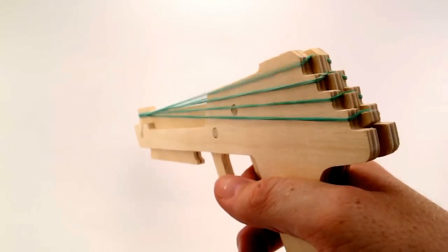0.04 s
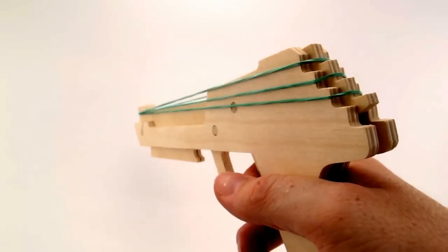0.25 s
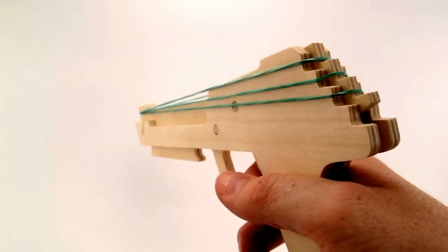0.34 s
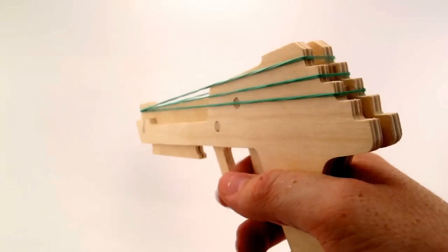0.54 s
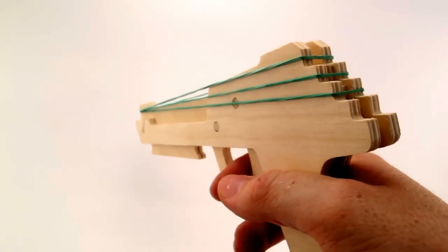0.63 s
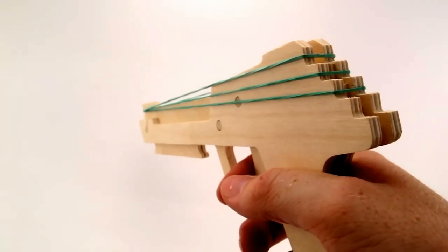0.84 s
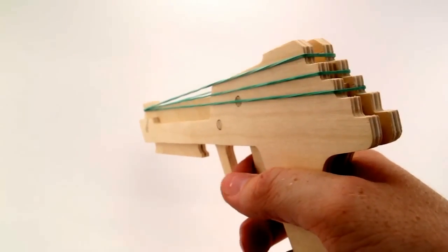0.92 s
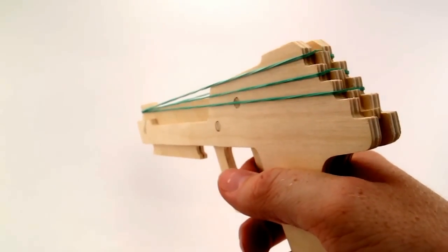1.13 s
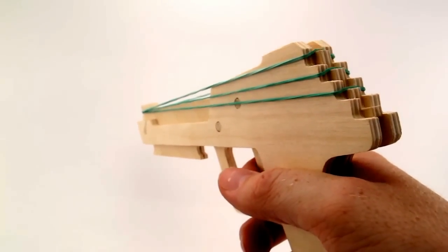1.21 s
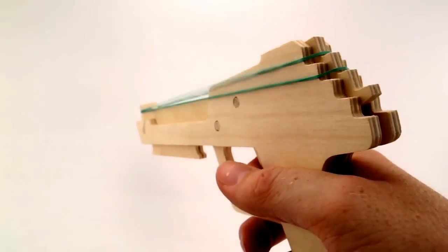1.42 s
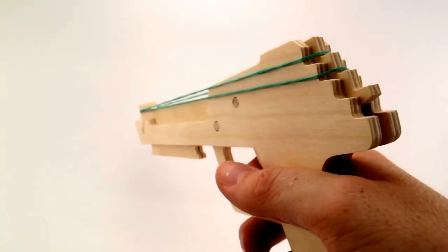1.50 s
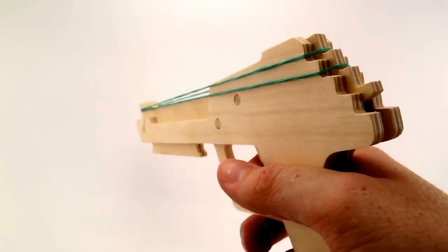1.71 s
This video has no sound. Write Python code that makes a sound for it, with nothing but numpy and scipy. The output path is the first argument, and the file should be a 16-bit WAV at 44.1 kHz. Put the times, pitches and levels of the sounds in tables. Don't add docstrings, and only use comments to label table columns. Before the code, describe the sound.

A wooden rubber band gun fires twice, sharp snapping cracks with creaky trigger ticks in a room

```python
import sys
import numpy as np
from scipy import signal
from scipy.fft import rfft, irfft, next_fast_len
from scipy.io import wavfile
from scipy.ndimage import uniform_filter1d

SR = 44100
rng = np.random.default_rng(int(sys.argv[2]) if len(sys.argv) > 2 else 0)


def put_to_file(sound):
    columns = np.atleast_2d(sound).T
    safe = np.clip(columns, -1, 1)
    whole_steps = np.round(safe * 32767)
    wavfile.write(sys.argv[1], SR, whole_steps.astype(np.int16))


def field_ratio(decibels):
    return 10 ** (np.asarray(decibels, dtype=float) / 20)


N = 77175

# f/Hz, likeness/1
LIKENESS = [(60, 0.89), (240, 1), (950, 1), (2000, 0.7), (3770, 0.52), (7000, .3), (15000, .05)]
# f/Hz, level/dB
AIR_PAN = [(60, -2.5), (240, -1.5), (950, -4), (3000, 8), (6400, -12.5), (15000, -0.5)]
# f/Hz, phase/rad
AIR_LEAD = [(100, -.06), (500, -.3), (1500, -.85), (4200, -3), (6500, -5), (16000, -10)]


def evened(x):
    return x / np.sqrt(np.mean(x ** 2) + 1e-20)


def read(points, hz):
    f, value = np.transpose(points)
    return np.interp(np.log(hz + 1), np.log(f + 1), value)


def camera_gain_db(t_s):
    # t/s, gain/dB
    gain_curve = [(0, -2), (.229, -3), (.252, -13.5), (.33, -16), (.5, -23), (.74, -21), (1.1, -14),
                  (1.39, -9.5), (1.47, -4), (1.5, -16), (1.6, -18.5), (1.75, -24.5)]
    return np.interp(t_s, *np.transpose(gain_curve))


def ports(pan, lead, hz):
    half_db = read(pan, hz) / 2
    return np.array([field_ratio(half_db) * np.exp(1j * read(lead, hz)), field_ratio(-half_db) + 0j])


def diffuse(first, second, hz):
    same = np.clip(read(LIKENESS, hz), -1, 1)[:, None]
    return np.array([first, same * first + np.sqrt(1 - same ** 2) * second])


def gun_parts():
    # f/Hz, width/Hz, level/dB
    body = [(1450, 600, -11.5), (1883, 75, -3), (1968, 210, 1.5), (2206, 200, 0)]
    # f/Hz, width/Hz, level/dB
    slide = [(3008, 560, 0), (3100, 1400, 0.5), (3490, 520, 3.5), (4240, 250, -6)]
    # f/Hz, width/Hz, level/dB
    teeth = [(4950, 380, 11.5), (5970, 600, 13), (6640, 620, 14.5), (7160, 550, 4.5), (8300, 1500, -1.5),
             (10000, 2400, -11)]
    # f/Hz, width/Hz, level/dB
    grip = [(110, 200, -11), (251.3, 400, -1.5), (391, 110, 9), (604, 50, 3.5), (1014, 1100, 14),
            (1510, 560, 17)]
    # f/Hz, width/Hz, level/dB
    catch = [(852, 50, -14), (1458, 77, 3), (2720, 330, 3), (4450, 490, 3.5), (4600, 400, 3.5),
             (9220, 820, -17)]
    # f/Hz, width/Hz, level/dB
    smack = [(9000, 1900, -3.5), (11800, 1200, 1), (14500, 3000, -4.5)]
    return [(body, 1000, 4000), (slide, 1800, 7000), (teeth, 3500, 11000),
            (grip, 60, 2500), (catch, 650, 10000), (smack, 6000, 16000)]


def ring(modes, low_hz, high_hz, blur):
    t = np.arange(2048) / SR
    sos = signal.butter(4, [low_hz, high_hz], "band", fs=SR, output="sos")

    def ringing(widening):
        modes_sum = 0
        for hz, width_hz, db in modes:
            decay = np.exp(-np.pi * abs(width_hz) * widening * t)
            modes_sum = modes_sum + field_ratio(db) * decay * np.sin(2 * np.pi * hz * t)
        return signal.sosfilt(sos, modes_sum)

    near, out = ringing(1), ringing(blur)
    return out * np.linalg.norm(near) / np.linalg.norm(out) / abs(near).max()


def stick_slip_grains(parts):
    grains_per_s, spread_db = 12000, 2.5
    strength = field_ratio(spread_db * np.minimum(rng.exponential(1, (3, N)), 4))
    grains = strength * rng.choice([-1., 1.], (3, N)) * (rng.random((3, N)) < grains_per_s / SR)
    return np.array([evened(g) / np.linalg.norm(ring(*p, 1)) for g, p in zip(grains, parts)])


def blows():
    # t/s, body level/dB, slide level/dB, teeth level/dB, grip level/dB
    slaps = [(.2072, -17, -19, -16, -29), (.2084, -15.5, -20, -9, -40.5),
             (.2108, -13.5, -20.5, -10.5, -45.5), (.2122, -17, -16.5, -16, -37.5),
             (.2133, -13.5, -16, 3.5, -25), (.2149, -15, -8.5, -11, -30), (.2162, -21.5, -14, -16.5, -14.5),
             (.2181, -12.5, -12, -14, -28.5), (.2194, -17.5, -24.5, -21, -26), (.2223, 0, 3.5, 2, -11.5),
             (.2232, -2.5, -1, 2, -22), (.2246, -7, -20, -17.5, -9.5), (.2261, -13, -17.5, -5.5, -17),
             (.2268, -8.5, -18.5, -19, -29), (.2286, -13, -17.5, -14, -28.5),
             (.23, -14, -16.5, -18.5, -19.5), (.6329, -54.5, -38, -35.5, -67.5),
             (.6345, -53, -33, -33.5, -69), (.6359, -54.5, -45, -30.5, -61), (.638, -39, -25, -16, -61.5),
             (.6392, -41, -38.5, -21, -66.5), (.6404, -51, -26, -17.5, -64.5),
             (.6417, -54.5, -34, -29, -61), (.6426, -53.5, -44.5, -31.5, -64),
             (1.4578, -21.5, -28, -23, -47), (1.4589, -33, -20, -16.5, -29.5),
             (1.461, -25, -29, -15.5, -37), (1.4628, -14, -16.5, -11, -31),
             (1.4643, -11.5, -18.5, -14, -21), (1.4657, -15, -16, -9, -27), (1.4677, -5, 2.5, -8, -8),
             (1.4686, -11.5, -8.5, -11.5, -7.5), (1.4695, -15.5, 4, 4, -22.5),
             (1.4706, -13.5, -1.5, -11, -22.5), (1.4726, -17.5, -19.5, -14, -21.5),
             (1.4738, -14, -17, -14, -16), (1.4755, -22.5, -19, -14, -27.5), (1.478, -33, -23.5, -28, -19)]
    # t/s, level/dB
    trigger_return = [
        (.6256, -55),
        (0.635, -45.5),
        (0.6379, -24.5),
        (0.6405, -47),
        (.6445, -42),
    ]
    # t/s, level/dB
    cracks = [
        (.2224, -18.5),
        (.2232, -22),
        (.6382, -51),
        (1.4679, -11.5),
        (1.4697, -18.5),
    ]
    drive = np.zeros((6, N))
    for table, first_part in ((slaps, 0), (trigger_return, 4), (cracks, 5)):
        for s, *parts_db in table:
            blow = np.sinc(np.arange(-8, 9) - s * SR % 1) * np.hanning(17)
            at = int(s * SR)
            hit = drive[first_part:first_part + len(parts_db), at - 8:at + 9]
            hit += field_ratio(parts_db - camera_gain_db(s))[:, None] * blow
    return drive


def rubs(grains):
    # start/s, length/s, level/dB, teeth rel. level/dB, body rel. level/dB
    strokes = [(.009, 0.0067, -44.5, 11, -4.5), (0.093, 0.041, -49, -2, -2), (0.137, 0.036, -51, 1.5, -5.5),
               (0.17, 0.058, -44.5, -3.5, -10), (0.2071, 0.0145, -31, 5, 7),
               (0.2257, 0.0034, -28.5, 5.5, 7), (0.541, 0.047, -69, 6.5, -2),
               (0.584, 0.008, -62.5, 5.5, -0.5), (0.6, 0.023, -70.5, 5.5, 4.5), (0.625, 0.007, -55, 3, -8),
               (0.6327, 0.014, -45.5, 4.5, 2), (1.088, 0.14, -67.5, 2.5, -6.5),
               (1.111, 0.063, -70.5, 8, -10.5), (0.211, 0.008, -34.5, 4.5, -13),
               (1.432, 0.026, -45.5, -1.5, -12), (1.4575, 0.0105, -35, 6, 1),
               (1.464, 0.0073, -18.5, 2.5, 5.5)]
    t, drive = np.arange(N) / SR, np.zeros((3, N))
    for s, length_s, db, bright_db, body_db in strokes:
        u = np.clip((t - s) / length_s, 0, 1)
        stroke = np.sin(np.pi * u ** .75) ** .45 * (u > 0) * (u < 1)
        parts_db = [[db + body_db], [db], [db + bright_db]]
        drive += field_ratio(parts_db - camera_gain_db(s)) * stroke * grains
    return drive


def ticks(grains):
    # t/s, level/dB, teeth rel. level/dB
    tick_events = [(.0105, -32, 0), (.0125, -30.5, 2.5), (.101, -26, -4.5), (.1575, -22, 4),
                   (.1765, -22.5, -3.5), (.181, -23, 11.5), (.189, -30.5, 14), (.582, -53, 13),
                   (.591, -51, -1.5), (.604, -50, 4), (.6258, -35.5, 2.5), (.6285, -45, 11.5),
                   (.6335, -37, 6), (1.436, -37, 0.5), (1.442, -30, 2.5), (1.446, -37, 11)]
    decay_s, body_rel_db = .0012, -17.5
    t, drive = np.arange(N) / SR, np.zeros((3, N))
    for s, db, bright_db in tick_events:
        stroke = np.exp(-abs(t - s) / decay_s * np.where(t < s, 2, 1))
        parts_db = [[db + body_rel_db], [db], [db + bright_db]]
        drive += field_ratio(parts_db - camera_gain_db(s) - 12.5) * stroke * grains
    return drive


def gun():
    far_blur = 2.4
    parts = gun_parts()
    grains = stick_slip_grains(parts)
    drive = blows()
    drive[:3] += rubs(grains) + ticks(grains)
    return [np.array([signal.oaconvolve(d, ring(*p, blur))[:N] for d, p in zip(drive, parts)])
            for blur in (1, far_blur)]


def at_ports(wood):
    # f/Hz, level/dB
    gun_pan = [(100, -0.5), (1100, 0.5), (1800, -0.5), (2800, 6.5), (4300, -1), (6400, -19.5), (9800, -3.5),
               (15000, -10)]
    # f/Hz, phase/rad
    gun_lead = [(100, 1), (1200, 0.33), (2500, 1), (4200, -1.5), (5300, -6), (6500, -4.5), (10000, -4.5),
                (16000, -6)]
    size = next_fast_len(N + 4096)
    gains = ports(gun_pan, gun_lead, np.fft.rfftfreq(size, 1 / SR))
    return irfft(rfft(wood.sum(axis=0), size) * gains, size)[:, :N]


def toward_walls(far):
    # start/s, end/s, body level/dB, slide level/dB, teeth level/dB, grip level/dB
    shots = [
        (0.199, .235, 10, 6.5, 8.5, 15.5),
        (1.456, 1.473, -6, 7, 11.5, 17.5),
    ]
    room_db, top_hz = -19, 10500
    t = np.arange(N) / SR
    level_db = room_db
    for start_s, end_s, *parts_db in shots:
        level_db = level_db + np.outer(np.pad(parts_db, (0, 2)), (t > start_s) * (t < end_s))
    sos = signal.butter(2, top_hz, fs=SR, output="sos")
    return signal.sosfilt(sos, (far * field_ratio(level_db)).sum(axis=0))


def room(x):
    # f/Hz, t60/s
    t60 = [(200, 0.56), (700, 0.35), (2000, 1), (6000, 0.88), (9000, 0.39), (14000, 0.28)]
    # f/Hz, level/dB
    walls = [(200, -4.5), (700, 8), (1250, 3.5), (2200, 2.5), (3200, 7.5), (4400, -1), (6500, 1.5),
             (12000, -8.5)]
    # f/Hz, level/dB
    room_pan = [(200, -1), (1000, -2), (3000, 2.5), (6400, -10.5), (12000, -7)]
    start_s, turns_per_s, gap = 0.0035, 130, 20
    out, turn = np.zeros((2, N)), np.arange(N) * turns_per_s / SR
    for k in range(3):
        taps = np.zeros((2, SR))
        at = np.arange(gap, SR - gap, gap) + rng.integers(0, gap, (2, (SR - gap - 1) // gap))
        np.put_along_axis(taps, at, rng.choice([-1., 1.], at.shape), 1)
        taps = taps * (np.arange(SR) > int(start_s * SR))
        hz, t, z = signal.stft(taps, SR, nperseg=256)
        z = diffuse(z[0], z[1], hz) * ports(room_pan, AIR_LEAD, hz)[:, :, None]
        decay_db = read(walls, hz)[:, None] - 60 * t / read(t60, hz)[:, None]
        tail = signal.istft(z * field_ratio(decay_db), SR, nperseg=256)[1]
        share = np.cos(np.pi * (turn + k / 3)) * np.sqrt(2 / 3)
        out += signal.fftconvolve((x * share)[None], tail / np.linalg.norm(tail[1]), axes=1)[:, :N]
    return out


def fan():
    # f/Hz, width/Hz, level/dB
    hum = [(39.6, 4.1, -51.5), (67, 14, -55.5), (100, 120, -47.5), (120, 9.7, -46.5), (192, 25, -48.5),
           (1635, 100, -53)]
    # t/s, level/dB
    rumble = [
        (0, 3),
        (.2, 1),
        (0.301, -1.5),
        (.33, -8.5),
        (.62, 0),
        (.75, 2.5),
        (1.1, -2),
        (1.45, -0.5),
        (1.56, -16.5),
        (1.75, -0.5),
    ]
    lumps_db = 1.8
    size = next_fast_len(N)
    hz = np.fft.rfftfreq(size, 1 / SR)
    left, other, slow = rfft(rng.standard_normal((3, size)))
    lumps = evened(irfft(slow / (1 + (hz / 12) ** 2), size)[:N])
    noise = np.array([left, left + .1 * other]) * ports(AIR_PAN, AIR_LEAD, hz)
    out = np.zeros((2, N))
    for f, width_hz, db in hum:
        band = noise / (1 + ((hz - f) / width_hz) ** 2)
        out += field_ratio(db) * evened(irfft(band, size)[:, :N])
    return out * field_ratio(np.interp(np.arange(N) / SR, *np.transpose(rumble)) + lumps_db * lumps)


def room_tone():
    # f/Hz, density/dB per Hz
    air_spectrum = [(25, -18.5), (270, -8.5), (600, -17.5), (3000, -22), (6800, -29), (9000, -41.5),
                    (12000, -49.5), (16000, -53)]
    air_db, patch_db, size, hop = -33.5, 1.7, 2048, 256
    hz = np.fft.rfftfreq(size, 1 / SR)
    a, b, c, d, patches = rng.standard_normal((N // hop + 5, len(hz), 5)).T
    patches = uniform_filter1d(patches, size=20, axis=0)
    patches = evened(uniform_filter1d(patches, size=14, axis=1))
    air = field_ratio(read(air_spectrum, hz))
    air = field_ratio(air_db) * air / np.linalg.norm(air)
    z = diffuse(a + 1j * b, c + 1j * d, hz)
    z = z * (air * ports(AIR_PAN, AIR_LEAD, hz))[:, :, None] * field_ratio(patch_db * patches)
    return 0.8 * signal.istft(z, nperseg=size, noverlap=size - hop)[1][:, :N]


def scene():
    wood, far = gun()
    return at_ports(wood) + room(toward_walls(far)) + fan() + room_tone()


def band_limit(x):
    return signal.sosfilt(signal.butter(12, 16400, fs=SR, output="sos"), x)


def record(dry):
    edge_hz = 16200
    clipped = np.clip(dry * field_ratio(camera_gain_db(np.arange(N) / SR)), -1, 1)
    edge = signal.firwin(127, edge_hz, window=("kaiser", 7), fs=SR)[None]
    return band_limit(np.clip(signal.oaconvolve(clipped, edge, "same"), -1, 1))


dry = scene()
out = record(dry)
put_to_file(out)
```